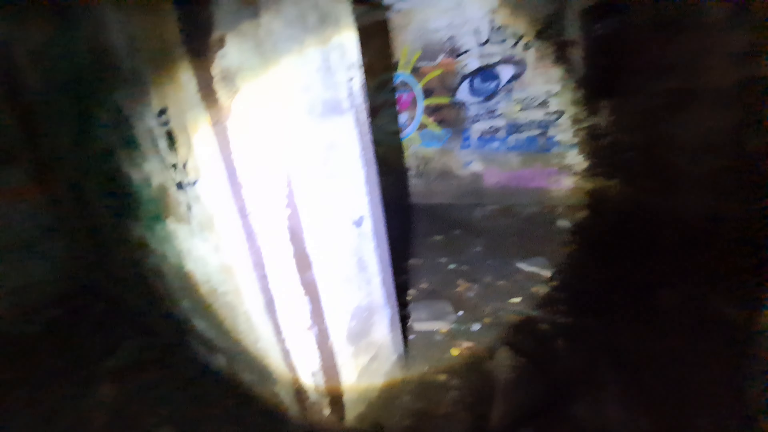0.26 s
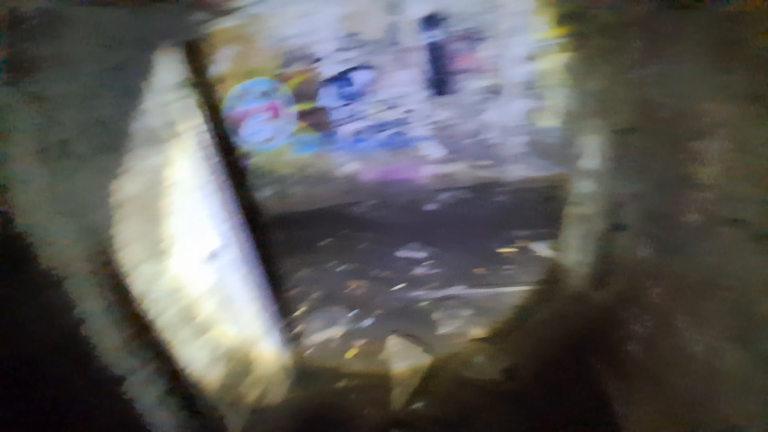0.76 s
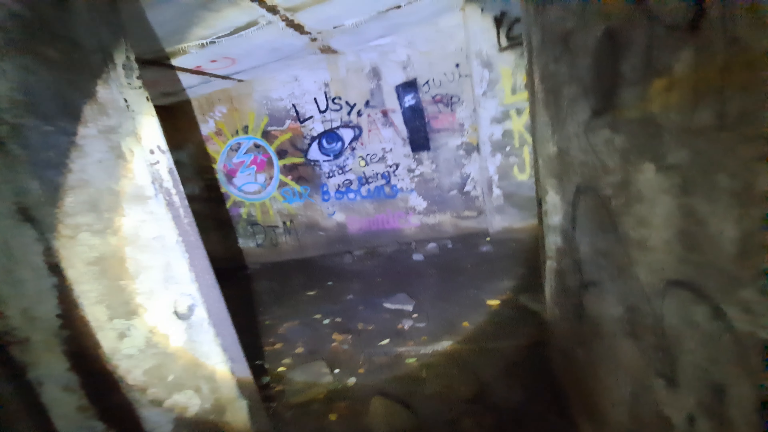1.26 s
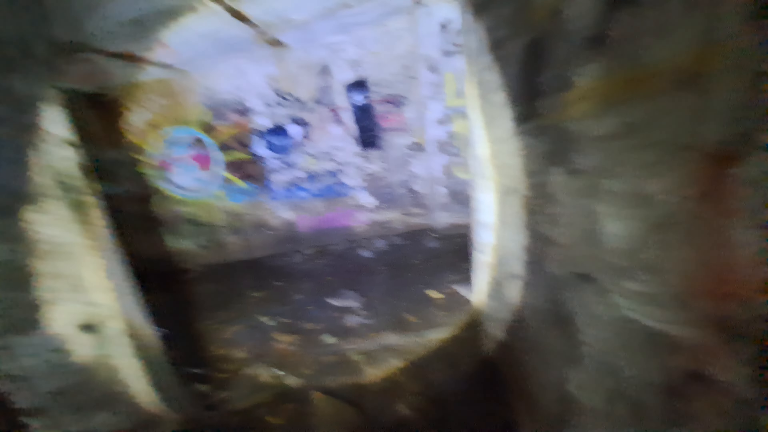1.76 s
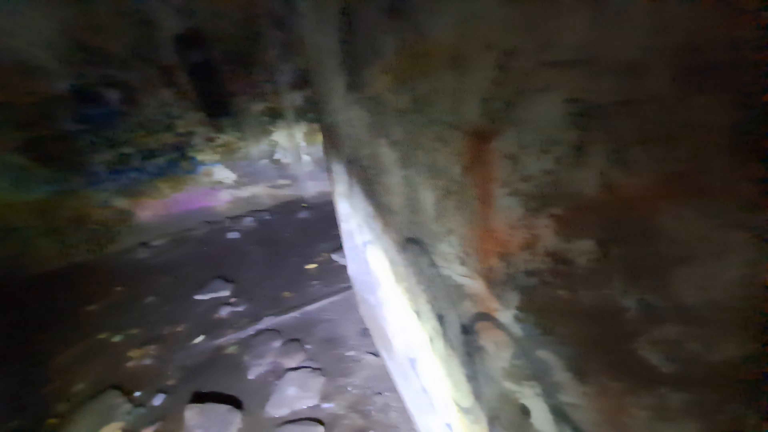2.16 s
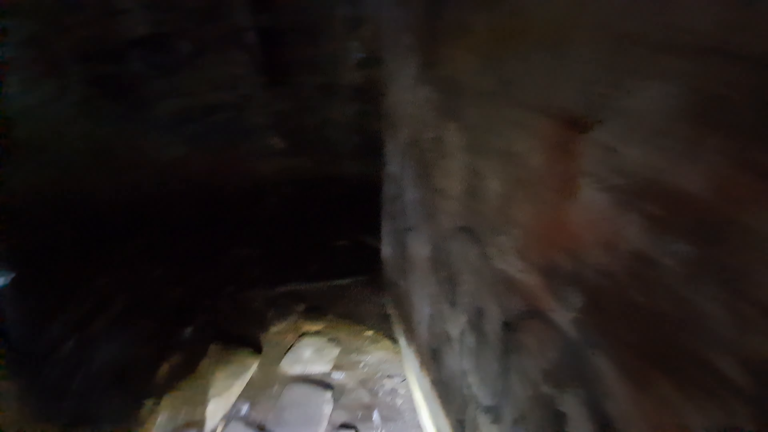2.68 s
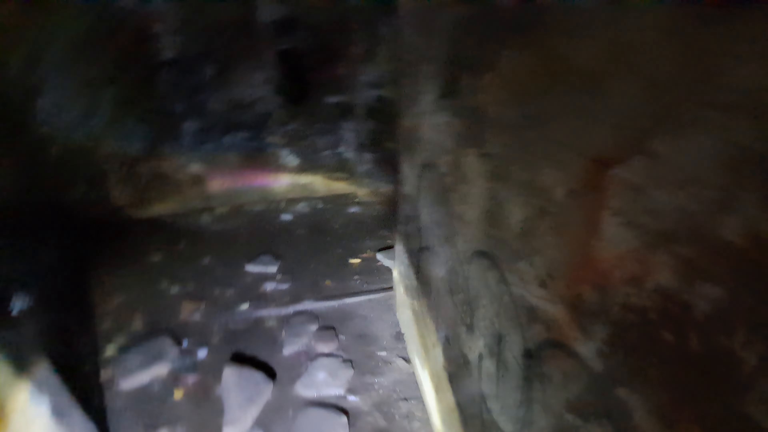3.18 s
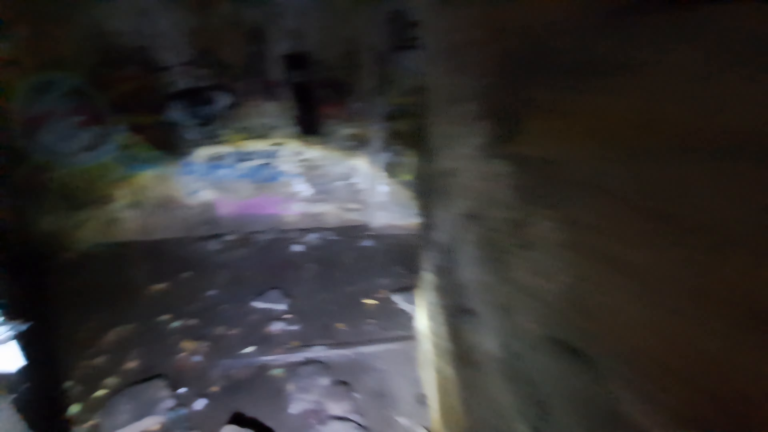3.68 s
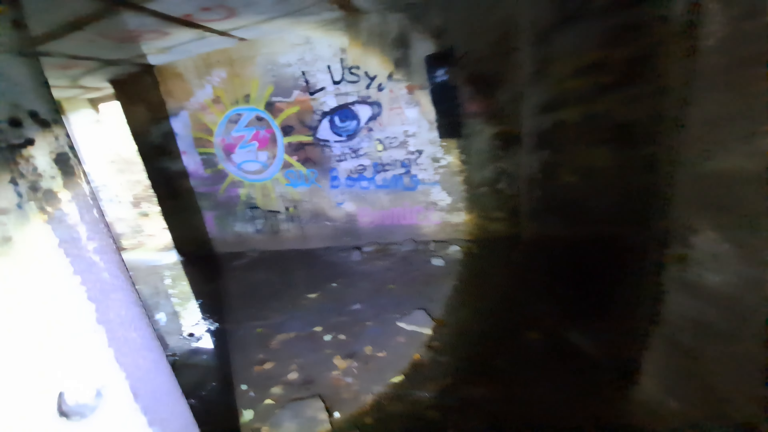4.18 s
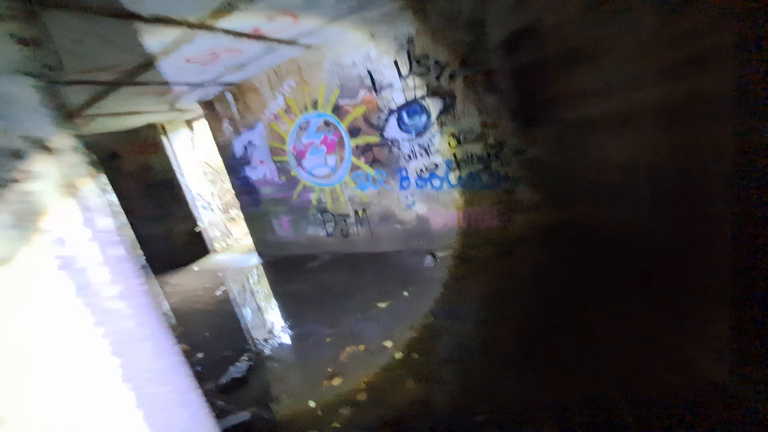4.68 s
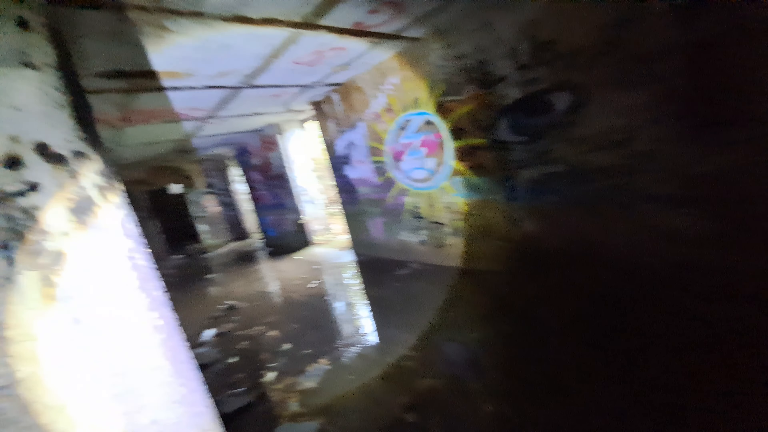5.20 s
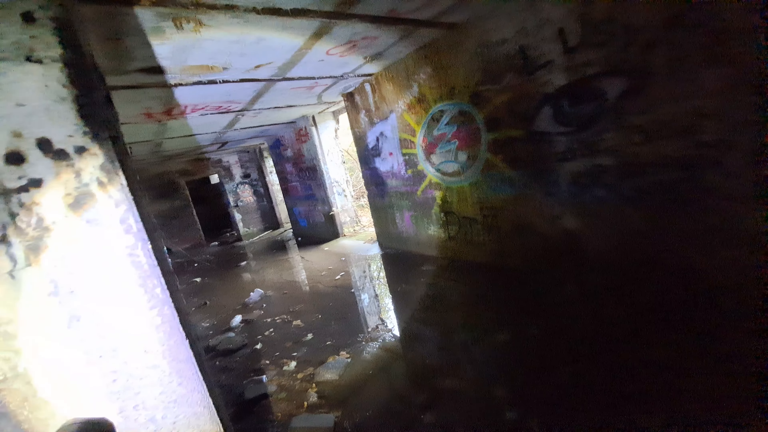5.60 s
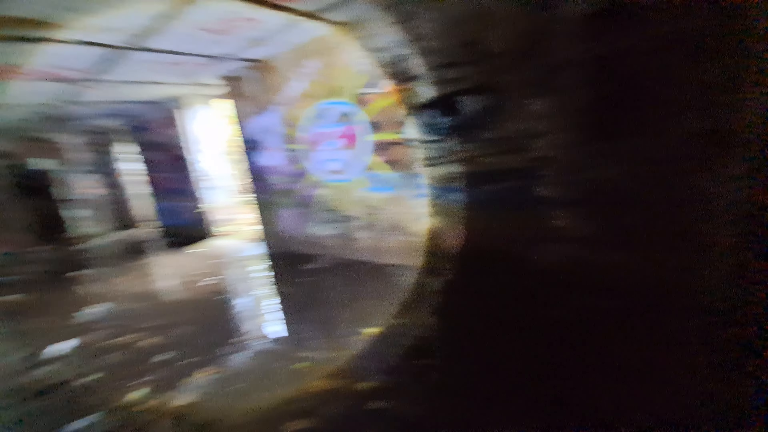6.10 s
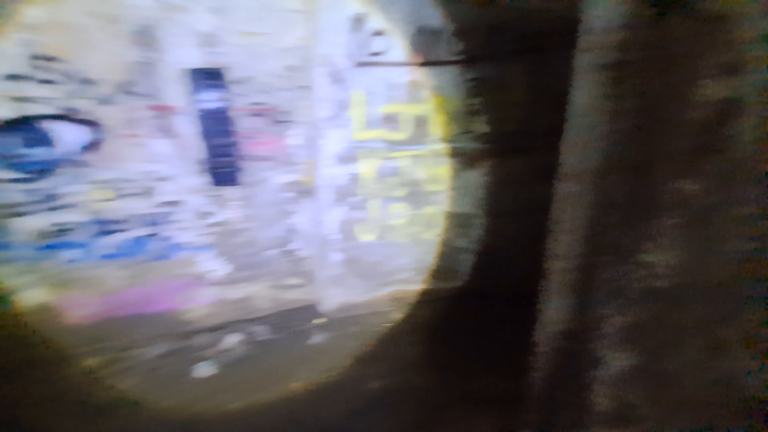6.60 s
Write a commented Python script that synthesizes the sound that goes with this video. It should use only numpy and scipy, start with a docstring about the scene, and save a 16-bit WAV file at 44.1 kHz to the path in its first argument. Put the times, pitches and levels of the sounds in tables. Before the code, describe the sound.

Over a faint, unsteady low hum, thin concrete flakes crack in irregular clusters under slow steps. After a near-silent gap, soles drag through dust and grit crunches, a heavy loose piece grates with a stony ring, and a smaller shard clinks and scrapes higher. Light crumbling and sharp snaps return at the end. Hard empty rooms add a short hollow echo; a handheld stereo microphone hears it close, with treble weighted right.

```python
"""A low hum and light snaps of concrete chips come first, then slow, uneven steps over rubble.
Snaps are sharp pulses that ring; grit and flakes are bursts of tiny random cracks.
A loose slab and a smaller shard grate and ring through resonances; soles drag and clothes rustle.
The hum is shaped noise with two wavering tones. Bare walls of an empty building answer the steps.
It is all heard from a hand-held camera with two sound inlets, called the left and right port."""
import sys
import numpy as np
from scipy import signal
from scipy.fft import rfft, irfft, next_fast_len
from scipy.io import wavfile
from scipy.ndimage import map_coordinates

SR = 44100
rng = np.random.default_rng(int(sys.argv[2]) if len(sys.argv) > 2 else 0)


def master_out(mix):
    """Clip the mix to full scale and print it as 16-bit PCM to the path in sys.argv[1]."""
    frames = np.transpose(np.atleast_2d(mix))
    ceiling = np.clip(frames, -1, 1)
    pcm = np.round(ceiling * 32767).astype(np.int16)
    wavfile.write(sys.argv[1], SR, pcm)


N = 302085  # length in samples
# Levels in the tables hold before the rooms answer and the ports colour the sound.
# A t60_s is the time a sound takes to fall by 60 dB.


def amp(db):
    """Turn decibels into a gain."""
    return 10 ** (np.asarray(db) / 20)


def unit(x):
    """Scale x to an average (rms) strength of 1."""
    return x / np.sqrt(np.mean(x ** 2) + 1e-20)


def along(points, hz):
    """Read a curve of (pitch, value) points, with pitch on a log axis."""
    point_hz, values = np.transpose(points)
    return np.interp(np.log(hz + 1), np.log(point_hz), values)


def curves(rows):
    """Give one value per sample for each column after the time."""
    times, *columns = np.transpose(rows)
    t = np.arange(N) / SR
    return [np.interp(t, times, column) for column in columns]


def wobble(rate, size=N):
    """Draw a smooth random curve through so many random points a second."""
    position = np.arange(size) * rate / SR
    return map_coordinates(rng.standard_normal(4096), [position], mode="wrap")


def filtered(x, response):
    """Multiply the spectrum of x by a response that depends on frequency."""
    size = x.shape[-1]
    padded = next_fast_len(size + 8192)  # room for the ringing
    hz = np.fft.rfftfreq(padded, 1 / SR)
    return irfft(rfft(x, padded) * response(hz), padded)[..., :size]


def coloured(x, spectrum):
    """Give x the tone of a (pitch_hz, level_db) table, at rms 1."""
    return unit(filtered(x, lambda hz: amp(along(spectrum, hz))))


def ring(x, modes, size_ratio=1):
    """Pass x through resonances (pitch_hz, width_hz, level_db); a bigger piece rings lower."""
    def response(hz):
        total = 0
        for centre, width, db in modes:
            damping = 1j * hz * width
            total = total + amp(db) * damping / ((centre / size_ratio) ** 2 - hz * hz + damping)
        return total
    return filtered(x, response)


def grains(size, rate, spread_db):
    """Scatter tiny fractures of unequal strength, so many a second, at each port; rms 1."""
    spread = spread_db * np.clip(rng.standard_normal(size), -2, 2)
    strength = rng.standard_normal((2, size)) * amp(spread)
    return unit(strength * (rng.random(size) < rate / SR))


def stroke(rise, t60):
    """Shape a push that swells and dies away, peak 1, cut off after 0.75 s."""
    t = np.arange(3 * SR // 4) / SR
    shape = (1 - np.exp(-t / rise)) * np.exp(-np.log(1000) * t / t60)
    return shape / shape.max()


def fractures(rise, t60, rate, spread_db):
    """Fracture grains under one stroke of pressure, rms 1 at its height."""
    push = stroke(rise, t60)
    return grains(len(push), rate, spread_db) * push


def add(track, s, sound):
    """Mix a sound into the track at time s."""
    part = track[..., max(round(s * SR), 0):][..., :sound.shape[-1]]
    part += sound[..., :part.shape[-1]]


def lean(left_db):
    """Port gains for a source off to one side; positive leans left."""
    return amp([[left_db / 2], [-left_db / 2]])


# How long the bare rooms ring at each pitch: pitch_hz, t60_s
HALL_DECAY = [(150, 0.36), (350, 1.95), (800, 1.14), (2000, 0.6), (5000, 0.27), (9000, 0.15), (15000, 0.34)]


def in_hall(x, wet_db):
    """Add the answer of bare concrete rooms: fading noise whose low-middle lasts longest."""
    hz, t, z = signal.stft(rng.standard_normal((2, SR)), SR, nperseg=256)
    fade = np.exp(-np.log(1000) * t / along(HALL_DECAY, hz)[:, None])
    tail = signal.istft(z * fade, SR, nperseg=256)[1]
    tail = tail / np.linalg.norm(tail[0])
    tail = np.pad(tail, ((0, 0), (SR // 200, 0)))  # the answer starts 5 ms late
    return x + amp(wet_db) * signal.fftconvolve(x, tail, axes=1)[:, :N]


# Swelling and sinking of the hum: time_s, level_db
HUM_LEVEL = [(0, -57), (.6, -61), (1.3, -56.5), (1.8, -58), (2.5, -55.5), (3.5, -53), (4.2, -51),
             (4.9, -51.5), (5.6, -59), (6.2, -60), (6.85, -56)]
# Tone of the hum's noise: pitch_hz, level_db
HUM_TONE = [(22, -49), (42, 0.5), (59, -3.5), (70, -9.5), (92, -5), (114, -9.5), (151, -7), (205, -7),
            (283, -12), (371, -15.5), (420, -20.5), (550, -23.5), (920, -120)]
# Wavering tones in the hum: pitch_hz, middle level_db against the hum level
HUM_DRONES = [(59.2, -5.5), (150.7, -14)]
# Tone of the moving air: pitch_hz, level_db
AIR_TONE = [(150, -33), (250, -25), (500, -6), (1020, -4), (1950, -12), (2960, -18), (5730, -14),
            (16000, -34)]


def hum(rumble_db=-1, side_db=-12, air_db=-62):
    """The building's low hum, nearly alike at both ports, over faint steady air noise."""
    level, = curves(HUM_LEVEL)
    t = np.arange(N) / SR
    mid, side = coloured(rng.standard_normal((2, N)), HUM_TONE) * amp(rumble_db)
    for hz, db in HUM_DRONES:
        loudness = amp(db + 3.7 * wobble(5)) * np.sqrt(2)
        phase = 2 * np.pi * hz * t + 1.74 * wobble(7.6)
        mid = mid + loudness * np.sin(phase)
    air = amp(air_db) * coloured(rng.standard_normal((2, N)), AIR_TONE)
    return amp(level) * (mid + amp(side_db) * np.array([side, -side])) + air


def swing(t, build_up, die_down, range_db=18):
    """Gain of a movement that gathers speed until t = 0, then slows."""
    return amp(-range_db * np.maximum(-t / build_up, t / die_down))


def rustle(t, hold, attack_s=0.012, t60_s=0.24):
    """Gain of a fold of cloth that catches at t = 0, slides for a moment and lets go."""
    attack = np.clip(t / attack_s, 0, 1)
    return attack * np.exp(-np.log(1000) * np.maximum(t - hold, 0) / t60_s)


# Leg swings: fastest_s, sole_level_db, cloth_level_db, build_up_s, die_down_s
LEG_SWINGS = [(0.36, -52, -52, 0.26, 0.31), (1.421, -57.5, -69.5, 1.45, 0.33),
              (3.42, -50.5, -58.5, 1.25, 1.8), (4.12, -41, -42.5, 0.38, 0.42),
              (4.95, -47.5, -47, 0.53, 0.48), (5.548, -53.5, -55.5, 0.32, 0.46),
              (6.38, -84, -58, 0.39, 0.57), (6.8, -55, -81, 1.12, 0.51)]
# Folds of clothing brushing past each other: start_s, level_db, hold_s
CLOTH_FOLDS = [(1.246, -62, 0.12), (1.558, -63.5, 0.094), (2.427, -61, 0.12), (2.654, -63, 0.076),
               (2.894, -60.5, 0.15), (3.3, -52, 0.26)]
# Tone of a sole dragging through dust: pitch_hz, level_db
DRAG_TONE = [(250, -1.5), (600, 5.5), (1200, 1.5), (2100, 7.5), (3300, 1.5), (4700, -3), (7500, -9),
             (9300, -11.5), (16000, -16.5)]
# Tone of rubbing cloth: pitch_hz, level_db
CLOTH_TONE = [(2500, -12.5), (5000, -1), (7500, -6), (9200, -16), (12300, -7.5), (16000, -15.5)]


def strides(flutter_db=1.3, flutter_per_s=45):
    """Each leg swing drags the sole through dust and rubs the clothes; single folds rustle on top."""
    t = np.arange(0, N / SR, .002)  # a coarse grid is enough for slow gains
    sole_power = cloth_power = 0
    for s, sole_db, cloth_db, build_up, die_down in LEG_SWINGS:
        speed = swing(t - s, build_up, die_down)
        sole_power = sole_power + (amp(sole_db) * speed) ** 2
        cloth_power = cloth_power + (amp(cloth_db) * speed) ** 2
    for s, db, hold in CLOTH_FOLDS:
        cloth_power = cloth_power + (amp(db) * rustle(t - s, hold)) ** 2
    sole, cloth = curves(np.column_stack([t, np.sqrt(sole_power), np.sqrt(cloth_power)]))
    dust = coloured(grains(N, rate=9000, spread_db=3), DRAG_TONE)
    fibres = coloured(grains(N, rate=9000, spread_db=3), CLOTH_TONE)
    dragging = sole * amp(flutter_db * wobble(flutter_per_s)) * dust
    rubbing = cloth * amp(flutter_db * wobble(flutter_per_s)) * fibres
    return dragging + rubbing


# The body's weight settling, and dull knocks of rubble: start_s, level_db, pitch_hz, t60_s
WEIGHT_THUDS = [(1.228, -54, 140, .75), (3.42, -50.5, 230, 0.81), (4.745, -50.5, 750, 0.24),
                (4.89, -46, 170, 0.43), (4.929, -43, 59, 0.53), (5.765, -47, 55.4, 0.51)]


def thuds(width=0.77):
    """Soft, dull bumps: noise through one broad resonance, twice, under a stroke."""
    out = np.zeros((2, N))
    for s, db, hz, t60 in WEIGHT_THUDS:
        mode = [(hz, width * hz, 0)]
        push = stroke(0.0075, t60)
        bump = ring(ring(rng.standard_normal(len(push)), mode), mode)
        add(out, s, amp(db) * unit(bump) * push)  # the same at both ports
    return in_hall(out, wet_db=-47)


# Short skids of a sole: start_s, level_db, length_s, start_pitch_hz, end_pitch_hz
SOLE_SKIDS = [(4.23, -41.5, 0.041, 530, 1020), (5.654, -50, 0.016, 760, 575)]


def scuffs(width_octaves=0.46, attack=0.0044, release_t60=0.072, wet_db=-7):
    """A sole skids over rubble: a hollow rasp that slides in pitch as the pressure changes."""
    out = np.zeros((2, N))
    t = np.arange(SR // 4) / SR
    for s, db, length, start_hz, end_hz in SOLE_SKIDS:
        hz, frames, z = signal.stft(grains(len(t), rate=3000, spread_db=2), SR, nperseg=256)
        centre_hz = np.interp(frames, [0, length], [start_hz, end_hz])
        octaves = np.log2((hz[:, None] + 1) / centre_hz)
        band = 1 / (1 + (octaves / width_octaves) ** 4)
        rasp = signal.istft(z * band, SR, nperseg=256)[1][:, :len(t)]
        release = np.exp(-np.log(1000) * np.maximum(t - length, 0) / release_t60)
        push = np.minimum(t / attack, 1) * release
        add(out, s, amp(db) * unit(rasp) * push)
    return in_hall(out, wet_db)


# A smaller shard rocking on its edges: start_s, level_db, t60_s
SHARD_ROCKS = [(4.893, -31, 0.083), (4.925, -34, 0.022), (4.96, -28.5, 0.078), (4.995, -44, 0.91)]
# Resonances of the shard: pitch_hz, width_hz, level_db
SHARD_MODES = [(2794, 93, 19), (4980, 270, 11.5), (7450, 140, 5.5), (10600, 3400, -17)]


def shard():
    """A thin shard tips and grates, ringing higher than the slab."""
    out = np.zeros((2, N))
    for s, db, t60 in SHARD_ROCKS:
        rub = fractures(0.0011, t60, rate=5600, spread_db=4.5)
        add(out, s, amp(db) * rub.std() * unit(ring(rub, SHARD_MODES)))
    return lean(left_db=5.5) * in_hall(out, wet_db=-12.0)


# Slips of the loose slab: start_s, level_db (high_db is added for the ring), t60_s,
# thud_db (low bending against level_db)
SLAB_GRINDS = [(3.31, -51, 0.38, -13), (3.419, -48, 0.075, 1), (3.531, -51.5, 0.31, 2.5),
               (3.77, -54.5, 0.45, -3.5), (3.865, -49.5, 0.25, -12), (3.953, -42.5, 0.2, -5.5),
               (4.026, -52, 0.33, 13), (4.121, -26.5, 0.21, -1), (4.155, -34, 0.13, -20),
               (4.189, -31, 0.077, -3.5), (4.213, -35.5, 0.19, -2.5), (4.262, -39, 0.55, -1),
               (4.31, -43, 0.26, -1.5), (4.378, -51, 0.082, 14.5), (4.49, -57, 1, 5.5)]
# Low bending resonances of the slab: pitch_hz, width_hz, level_db
SLAB_BEND_MODES = [(351.6, 7.8, 9), (381, 54, -1.5), (441, 63, -4.5)]
# Ringing resonances of the slab, before the load shifts them: pitch_hz, width_hz, level_db
SLAB_RING_MODES = [(1677, 48, -8), (1976, 30, -13), (2143, 61, 6.5), (2690, 72, -19), (3930, 160, -12),
                   (4970, 210, -7), (5400, 120, -18), (6900, 140, -16)]
# The ring wavers with the walker's weight: time_s, size_ratio (above 1 rings lower)
SLAB_WEIGHT = [(3.55, 1.03), (3.8, 0.987), (4.2, .995), (4.26, 1.02)]


def slab(high_db=2.5, bend_top_hz=440, load_spread=.006):
    """A loose slab grinds over the floor in slips; the shifting load detunes its ring each time."""
    low, high = np.zeros((2, 2, N))
    long_waves = signal.butter(2, [290, bend_top_hz], "band", fs=SR, output="sos")
    for s, db, t60, thud_db in SLAB_GRINDS:
        rub = fractures(0.00049, t60, rate=2800, spread_db=2.0)[0]  # reaches both ports alike
        gain = amp(db) * rub.std()
        bend = signal.sosfilt(long_waves, ring(rub, SLAB_BEND_MODES))
        add(low, s, gain * amp(thud_db) * unit(bend))
        load = np.interp(s, *np.transpose(SLAB_WEIGHT))
        load = load * np.exp(load_spread * rng.standard_normal())
        add(high, s, gain * unit(ring(rub, SLAB_RING_MODES, load)))
    ringing = amp(high_db) * lean(left_db=3.0) * in_hall(high, wet_db=-5)
    return in_hall(low, wet_db=-20.5) + ringing


# How the feet sound as the camera turns: time_s, left_lean_db, treble_db (near 7 kHz),
# low_ring_db (lowest resonance of a snapping chip)
FEET_SOUND = [(0.3, 4, -4, -7), (0.85, 1, 7, -1.5), (1.9, -0.5, -1.5, 1), (2.1, -5.5, -2, -2),
              (5.4, 3.5, -4, -11), (5.83, 4, 0.5, -4.5), (6.2, 3.5, -3.5, -13), (6.8, -3, -1, 3)]


def underfoot(x, s, treble_db):
    """Place and colour a sound made under the feet at time s; treble_db acts from 11 kHz up."""
    times, left_db, edge_db, _ = np.transpose(FEET_SOUND)
    colour = [(4700, 0), (7300, np.interp(s, times, edge_db)), (11000, treble_db)]
    return lean(np.interp(s, times, left_db)) * filtered(x, lambda hz: amp(along(colour, hz)))


# Resonances of a concrete chip, before its size shifts them: pitch_hz, width_hz, level_db
CHIP_MODES = [(2945, 260, 7.5), (4184, 240, 5), (4830, 1100, 3.5), (6210, 500, -4.5), (7500, 280, -2),
              (11350, 960, -10.5)]


def chip(force, low_ring_db, upper_db=0, size_spread=0.038, cut_hz=1900):
    """A thin flake, too small to radiate bass; its lowest mode depends on where it is pressed."""
    size_ratio = np.exp(size_spread * rng.standard_normal())
    low = ring(force, CHIP_MODES[:1], size_ratio)
    middle = ring(force, CHIP_MODES[1:2], size_ratio)
    upper = ring(force, CHIP_MODES[2:], size_ratio)
    sound = amp(low_ring_db) * low + middle + amp(upper_db) * upper
    return signal.sosfilt(signal.butter(2, cut_hz, "high", fs=SR, output="sos"), sound)


# Thin flakes crumbling: start_s, level_db (before underfoot colours it), rise_s, t60_s, low_ring_db
FLAKE_CRUMBLES = [(0.815, -50.5, 0.014, 0.7, 5.5), (1.432, -50, 0.0059, 0.13, 18),
                  (1.631, -61, 0.012, 0.16, 9), (1.836, -62, 0.023, 0.74, 0),
                  (5.367, -53.5, 0.041, 0.81, -17), (5.611, -45.5, .012, 0.17, -2),
                  (5.802, -40, 0.0015, 0.086, -1), (5.832, -39, 0.0034, 0.089, -20),
                  (5.85, -58.5, .005, 0.8, -15), (6.135, -51, .05, 0.26, -9), (6.805, -64, .01, 0.32, 17)]


def crumbles(treble_db=-4):
    """Flakes give way in a rush of tiny cracks, each ringing like a chip."""
    out = np.zeros((2, N))
    for s, db, rise, t60, low_ring_db in FLAKE_CRUMBLES:
        push = stroke(rise, t60)
        cracks = unit(chip(grains(len(push), rate=1700, spread_db=0.0), low_ring_db, upper_db=-8))
        add(out, s, amp(db) * underfoot(cracks * push, s, treble_db))
    return in_hall(out, wet_db=-6.0)


# Grit crushed by a step: start_s, level_db (before the two tone columns act), rise_s, t60_s,
# middle_db (1.2 kHz and below), treble_db (8.5 kHz and above)
GRIT_CRUNCHES = [(0.526, -50, 0.0018, 0.2, 1, -34), (3.172, -33, 0.0011, 0.4, -7, -8.5),
                 (3.591, -44, 0.0011, 0.38, 9.5, 7), (3.951, -41, 0.0012, 0.29, 7.5, -4),
                 (4.031, -42.5, .001, 0.085, 7, -3), (4.076, -41, 0.00077, 0.026, 4, 6),
                 (4.121, -38, 0.0045, 0.17, 8.5, 10), (4.252, -42, 0.011, 0.26, 8, 9.5),
                 (4.365, -40, .001, 0.036, -5, -10), (4.639, -44, 0.00034, 0.22, 14.5, 4.5),
                 (4.741, -41, 0.00078, 0.17, 10.5, 10.5), (5.122, -54.5, 0.00088, 0.28, 4, 23.5),
                 (6.61, -51, 0.051, 0.17, 7, -46)]
# Common tone of the grit: pitch_hz, level_db
GRIT_TONE = [(250, -19.5), (600, -12.5), (1300, -13), (2100, -1.5), (3000, 2.5), (3700, -3.5), (5000, -1.5),
             (6200, -6.5), (7500, -8.5), (9300, -16.5), (12500, -15), (16000, -24)]


def crunches(clump_db=2.5, clumps_per_s=220):
    """A sole comes down on grit: fractures in clumps, coarser or finer from step to step."""
    out = np.zeros((2, N))
    for s, db, rise, t60, middle_db, treble_db in GRIT_CRUNCHES:
        push = stroke(rise, t60)
        clumps = amp(clump_db * wobble(clumps_per_s, size=len(push)))
        grit = coloured(clumps * grains(len(push), rate=7000, spread_db=2.5), GRIT_TONE)
        step_tone = [(1200, middle_db), (2700, 0), (5400, 0), (8500, treble_db)]
        grit = filtered(grit, lambda hz: amp(along(step_tone, hz)))
        add(out, s, amp(db) * grit * push)
    return in_hall(out, wet_db=-2.5)


# Chips snapping under a sole: start_s, peak_db (mean of both ports), treble_db (11 kHz and above)
CHIP_SNAPS = [(0.097, -33.5, -2), (0.159, -36, -3), (0.3323, -28.5, 0), (0.649, -36, -8),
              (0.8127, -22.5, -20), (0.8251, -11, 0), (0.827, -16, -1), (0.841, -19, -22),
              (0.861, -17.5, -21), (0.976, -25.5, -7), (1.0226, -35.5, -19), (1.145, -29, -30),
              (1.158, -29.5, -6), (1.4435, -19, -16), (1.8387, -39, -24), (1.8884, -36.5, -20),
              (1.901, -37, -15), (1.91, -32.5, -7), (1.9485, -30, -25), (2.101, -38, -20),
              (2.1085, -28.5, -5.5), (5.438, -25.5, -27), (5.626, -25.5, 3), (5.785, -26.5, -1),
              (5.8046, -20.5, -6), (5.8082, -22.5, -7), (5.8345, -17.5, -20), (5.8424, -23, -20),
              (6.1832, -24, -12), (6.421, -33, 2), (6.7726, -28.5, -27), (6.8023, -13, 0.5),
              (6.8086, -29, -15), (6.822, -12.5, -32), (6.8322, -28, -20)]


def snaps(crumb_db=-30):
    """A chip breaks with one sharp crack, then its crumbs patter; the left port hears the crack first."""
    out = np.zeros((2, N))
    times, _, _, ring_db = np.transpose(FEET_SOUND)
    for s, db, treble_db in CHIP_SNAPS:
        low_ring_db = np.interp(s, times, ring_db)
        crumbs = fractures(.0005, .045, rate=4000, spread_db=2)[:, :4096]
        force = amp(crumb_db) * crumbs
        force[0, 0] += 1
        force[1, 13] += 1  # 13 samples, about 0.3 ms, later on the right
        crack = underfoot(chip(force, low_ring_db), s, treble_db)
        peak = np.abs(crack).max(axis=1).mean()
        add(out, s, amp(db) * crack / peak)
    return in_hall(out, wet_db=-7.5)


def scene():
    """Add up the building, the walker's clothes and everything underfoot."""
    background = hum() + strides()
    rubble = thuds() + scuffs() + shard() + slab()
    return background + rubble + crumbles() + crunches() + snaps()


# Balance of the two ports: pitch_hz, left_minus_right_db
PORT_BALANCE = [(60, -1.5), (300, -1.5), (550, -0.5), (1000, -7.5), (2200, -15.5), (4000, -13.5),
                (6000, -16.5), (7500, -12.5), (9300, 1.5), (12500, -8), (16000, -12)]
# Treble shape shared by both ports: pitch_hz, level_db
PORT_TREBLE = [(7800, -1), (9300, -9), (10800, -2.5), (13000, 4), (15800, -0.5)]


def record(dry, top_hz=16100):
    """The shaded left port hears less of most treble; both dip near 9 kHz and stop at top_hz."""
    def ports(hz):
        left = amp(along(PORT_BALANCE, hz))
        same_power = np.sqrt(2 / (1 + left ** 2))  # keeps the summed power of the pair
        return np.array([left, np.ones_like(left)]) * same_power
    return filtered(dry, lambda hz: ports(hz) * amp(along(PORT_TREBLE, hz)) * (hz < top_hz))


dry = scene()
out = record(dry)
master_out(out)
```